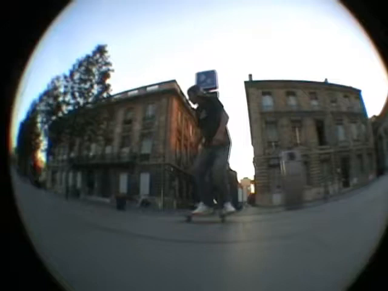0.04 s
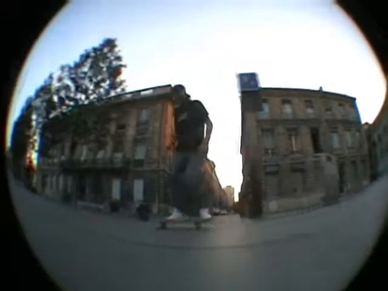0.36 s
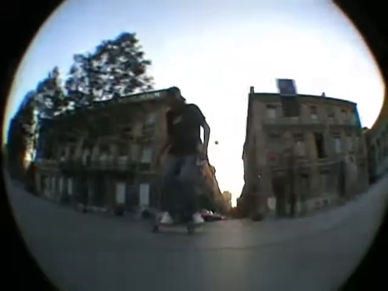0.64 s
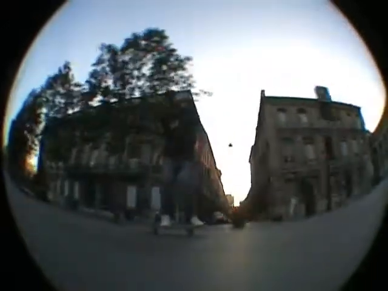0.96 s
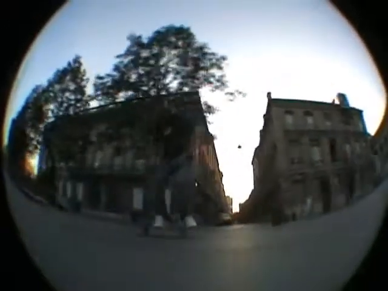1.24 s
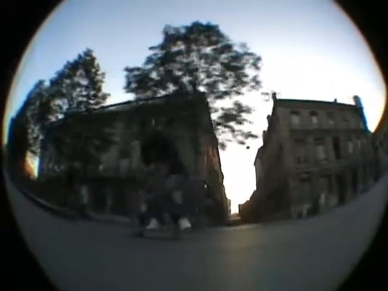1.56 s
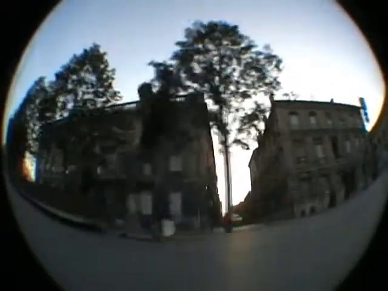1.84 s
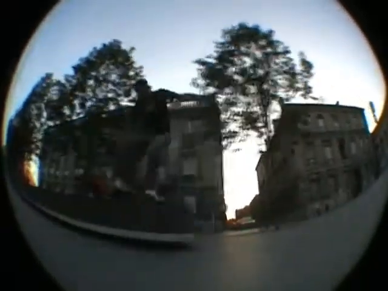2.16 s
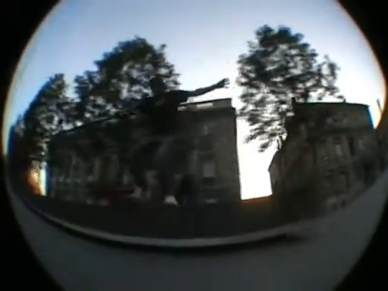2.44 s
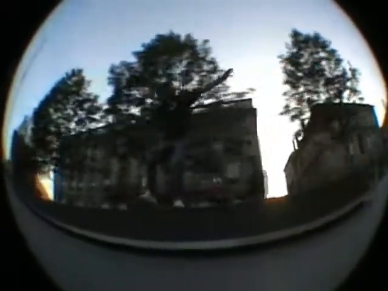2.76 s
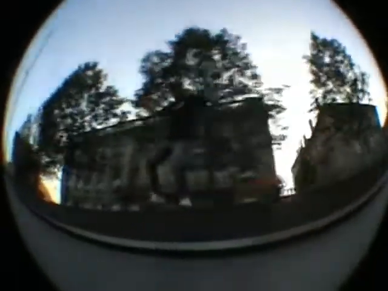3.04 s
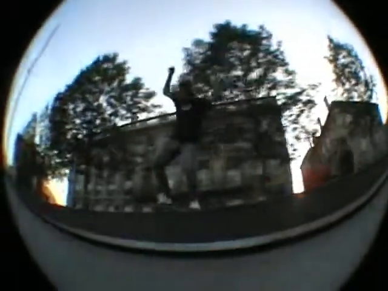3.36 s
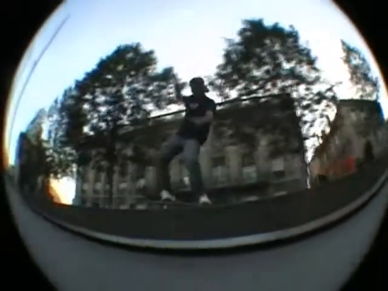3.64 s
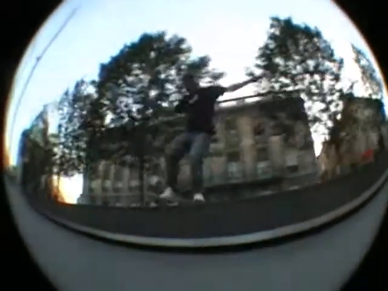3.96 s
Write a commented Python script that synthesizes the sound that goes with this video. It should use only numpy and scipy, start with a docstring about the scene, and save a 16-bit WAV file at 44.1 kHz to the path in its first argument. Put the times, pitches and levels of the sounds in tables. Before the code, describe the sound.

A skateboard cuts in at about 0.2 seconds, rolling close by over paving with a hollow, gritty rumble and clacking over joints several times a second. Low wind buffets the microphone, stronger from about 1.4 seconds. Near 2 seconds the tail cracks on the stone for a jump and the rolling briefly dips. From 2.5 seconds the wheels ring louder, with faint metal chinks, clacking on until 4 seconds.

```python
"""A skateboard rolls over the paving slabs of an open square, heard by a camera just above the ground.
The sound cuts in mid-ride: grit under the wheels keeps the deck booming and hissing, each axle clacks
over the joints between slabs, and air buffets the microphone. Soon loose steel chinks for the first time.
Halfway through, the tail cracks on the stone for a jump; then the wheels ring louder, with more chinks.
All along, the camera's hum filter and limiter give everything a hollow, squeezed colour."""
import sys
import numpy as np
from scipy import signal
from scipy.fft import rfft, irfft
from scipy.io import wavfile
from scipy.ndimage import uniform_filter1d

SR = 44100
rng = np.random.default_rng(int(sys.argv[2]) if len(sys.argv) > 2 else 0)


def to_wav(sig):
    """Store sig (one row per channel, or 1-D mono) as 16-bit WAV at the path in sys.argv[1].

    Samples outside -1..1 are clipped; the rate is SR.
    """
    pcm = np.clip(np.atleast_2d(sig), -1, 1) * 32767
    pcm = np.round(pcm).astype(np.int16)
    wavfile.write(sys.argv[1], SR, pcm.T)  # frames by channels


N = 176400

# how hard the air hits the microphone: t/s, level/dB
GUSTS = [(.6, -26.5), (1.4, -19), (2.1, -20.5), (2.6, -17.5), (3.95, -25)]
# tone of that air at the two microphone openings: f/Hz, shared level/dB, opposed level/dB
WIND_TONE = [(20, -31, -26), (55.4, -8, 1), (103, -3.5, 8), (183, 1, 1), (274, -9.5, -6.5),
             (420, -24, -16.5), (2000, -70, -53)]
# hum and thin ringing of wheels and bearings: f/Hz, width/Hz, level/dB
WHEEL_TONES = [(176, 40, -26), (1817, 81, -29.5), (4616, 170, -34.5), (5640, 400, -41.5)]
# that ringing swells in the second half: t/s, level/dB
WHEEL_SWELL = [(2.25, -6.5), (2.55, -0.5)]
# loose steel chinks in a truck (the metal axle holder): t/s, level/dB
CHINKS = [(.769, -32), (2.495, -30), (3.52, -25), (3.896, -23)]
# hollow knock of the deck (the wooden plank): f/Hz, level/dB
DECK_TONES = [(525, -1.5), (690, -5.5)]
# ringing of the wood when its tail hits the stone: f/Hz, level/dB
TAIL_TONES = [(1440, -10.5), (2790, -4.5), (3240, -11), (5170, -13.5)]
# an axle crosses a joint or jolts on the stone: t/s, bass boom/dB, middle clack/dB, treble tick/dB
JOINTS = [(.245, -0.5, -10.5, -18.5), (0.348, -14, -15, -25), (0.362, -2.5, -7.5, -18),
          (.463, -17, -15, -24.5), (.562, -2, -10, -19), (.655, -32, -11.5, -19.5), (.680, -2, -6, -18.5),
          (0.77, -36, -14, -31), (.882, -2.5, -8, -19.5), (.972, -26, -15, -25), (.999, -2, -8, -19),
          (1.088, -17, -14.5, -31), (1.206, 1, -6.5, -18), (1.325, 1, -7.5, -17.5), (1.342, -14, -7, -14),
          (1.529, -2, -7, -14), (1.644, -14, -11, -24), (1.653, -1, -11.5, -18), (1.825, -10, -12, -18.5),
          (1.858, -3, -12, -20.5), (1.938, -25, -13, -17.5), (1.968, -26, -10, -16),
          (1.983, -16, -14.5, -23), (2.198, -5, -12.5, -22.5), (2.243, -7.5, -13.5, -15.5),
          (2.325, -5, -9.5, -21), (2.545, -3, -6, -18.5), (2.675, -2.5, -7.5, -15), (2.753, -19, -25, -24),
          (2.901, 1.5, -10, -20), (3.03, -2.5, -7.5, -20), (3.255, -4.5, -8, -17.5),
          (3.388, -11.5, -10, -18.5), (3.521, -15, -14.5, -22), (3.615, -7.5, -10.5, -18.5),
          (3.753, 0, -8.5, -15.5), (3.896, -26, -13, -23), (3.978, -13, -9, -19)]
# rolling between joints: t/s, level/dB, brightness/dB (added once to the middle, twice to the treble)
ROLLING = [(.18, 0.5, 0), (.3, -2.5, 0.4), (.48, 1, -1.5), (.72, -1.5, 1), (1.13, 0.5, -0.9),
           (1.72, 0.5, -0.56), (2.05, -3.5, 0), (2.17, 0, -1), (2.28, -6.5, 0), (2.39, -6.5, 0.2),
           (2.52, 0.5, 1), (2.6, -3.5, 1.5), (2.97, 0.3, 0), (3.55, -1, 0.9), (3.95, 0.5, 0.6)]
# how board and wheels ring: f/Hz, level/dB
BOARD_TONE = [(90, -18.5), (200, -18.5), (280, -9.5), (335, -1.5), (375, 0.5), (440, -2.5), (520, -2.5),
              (630, -5), (730, -4), (810, -11.5), (960, -16), (1250, -13), (1600, -14), (1880, -10.5),
              (2330, -12.5), (2600, -16), (4400, -24.5), (6500, -32), (9400, -35.5), (12000, -43),
              (15500, -65)]
# shaking of the board, a row each for bass, middle and treble (bands 0, 1, 2):
# rolling/dB, grit unevenness/dB, joint/dB, joint rise/s, joint decay/s, left-right difference/dB
BANDS = [(-13.5, 1.26, 0.84, 0.00082, 0.0055, -22.5), (-21, 1.7, -0.05, .0006, 0.01, -16.5),
         (-32, 3, -1.2, 0.00047, 0.0063, -5)]
# where the board sits between the ears: f/Hz, left minus right/dB
BALANCE = [(750, 1.86), (2200, .5), (4600, 1.7), (10500, -1.5)]

BAND_EDGES_HZ = (965, 3830)  # borders of bass, middle and treble
GRAINS_PER_S, FLUTTER_HZ, FLUTTER_DB = 12000, 34, 1.2
CHATTER_HZ, CHATTER_DB = 350, 2  # a loose truck breaks knocks and chinks into tiny impacts
SCUFF_S, SCUFF_DB, SNAP_DB = .0055, -10, -8.5
SECOND_WHEEL_S, SECOND_WHEEL_DB = .0055, -6
RATTLE_S, RATTLE_DB = .014, -9.5
DECK_T60_S, DECK_PITCH_SPREAD = .059, .044  # T60 is the time to fade by 60 dB
JUMP_S, TAIL_T60_S = 1.969, .032
CHINK_DECAY_S, CHINK_HZ, CHINK_WIDTH_HZ = .014, 9020, 770
WIND_LEAN_DB = 1.37  # left goes up by this much, right goes down
HUM_HZ, HUM_FEEDBACK, HUM_DEPTH, HUM_FADE_HZ = 150.25, .48, .92, 17300
LIMIT_DB, LIMIT_SLOPE, RECOVER_DB_PER_S = -7, .63, 59
START_S, CEILING, TOP_HZ = .165, 1.08, 15700


def amp(db):
    """Turns decibels into a number to multiply by."""
    return 10 ** (np.asarray(db) / 20)


def unit(x):
    """Scales a signal to an average strength (rms) of 1."""
    return x / np.sqrt(np.mean(x ** 2) + 1e-20)


def spectrum(points, hz):
    """Reads a table on a log-frequency axis."""
    f, value = np.transpose(points)
    return np.interp(np.log(hz + 1), np.log(f + 1), value)


def curve(rows, column=1):
    """Reads one column of a table over time."""
    rows = np.array(rows)
    return np.interp(np.arange(N) / SR, rows[:, 0], rows[:, column])


def add(mix, start_s, sound):
    """Mixes a sound in at a given time."""
    part = mix[:, round(start_s * SR):][:, :sound.shape[1]]
    part += sound[:, :part.shape[1]]


def wander(rate_hz):
    """A random drift of strength 1, with little movement faster than rate_hz."""
    hz = np.fft.rfftfreq(N, 1 / SR)
    return unit(irfft(rfft(rng.standard_normal(N)) / (1 + (hz / rate_hz) ** 4), N))


def hiss(centre_hz, width_hz):
    """Noise of strength 1, gathered around one pitch."""
    offset_hz = np.fft.rfftfreq(N, 1 / SR) - centre_hz
    return unit(irfft(rfft(rng.standard_normal(N)) / (1 + (offset_hz / width_hz) ** 2), N))


def struck(tones, t60_s, pitch=1, size=6000):
    """Tones that ring out after one blow."""
    t = np.arange(size) / SR
    return sum(amp(db - 60 * t / t60_s) * np.sin(2 * np.pi * hz * pitch * t) for hz, db in tones)


def wind():
    """Air buffets in low lumps, mostly pushing at one microphone opening as it pulls at the other."""
    hz, table = np.fft.rfftfreq(N, 1 / SR), np.array(WIND_TONE)
    shape = amp([spectrum(table[:, [0, k]], hz) for k in (1, 2)])
    shared, opposed = unit(irfft(rfft(rng.standard_normal((2, N))) * shape, N))
    left = (shared + opposed) * amp(WIND_LEAN_DB)
    right = (shared - opposed) / amp(WIND_LEAN_DB)
    return np.array([left, right]) * amp(curve(GUSTS) + wander(rate_hz=4.8))


def wheels():
    """Wheels and bearings hum and ring thinly as they roll."""
    ringing = sum(amp(db) * hiss(hz, width_hz) for hz, width_hz, db in WHEEL_TONES)
    return ringing * amp(curve(ROLLING) + curve(WHEEL_SWELL))


def chinks():
    """Sudden, quickly dying flurries of tiny impacts ring a small piece of steel."""
    t = np.arange(N) / SR
    flurries = sum(amp(db) * (t >= s) * np.exp(-abs(t - s) / CHINK_DECAY_S) for s, db in CHINKS)
    return flurries * hiss(CHINK_HZ, CHINK_WIDTH_HZ) * amp(CHATTER_DB * wander(CHATTER_HZ))


def deck():
    """The wood knocks hollowly at each joint, and cracks once as the tail is snapped down."""
    out = np.zeros((2, N))
    for s, boom_db, *_ in JOINTS:
        pitch = 1 + DECK_PITCH_SPREAD * rng.standard_normal()
        add(out, s, amp(boom_db) * struck(DECK_TONES, DECK_T60_S, pitch)[None])
    add(out, JUMP_S, struck(TAIL_TONES, TAIL_T60_S)[None])
    return out


def board_ring(band, size=4096):
    """How the board rings after one tap, in its bass, middle or treble."""
    hz = abs(np.fft.fftfreq(size, 1 / SR))
    below_middle, below_treble = (1 / (1 + (hz / edge) ** 10) for edge in BAND_EDGES_HZ)
    share = [below_middle, (1 - below_middle) * below_treble, 1 - below_treble][band]
    gain = amp(spectrum(BOARD_TONE, hz)) * np.sqrt(share)
    # minimum phase: the ring starts at the tap and then dies away
    response = np.exp(np.conj(signal.hilbert(np.log(gain + 1e-5))))
    ring = np.fft.ifft(response).real[:size // 2]
    return ring / np.linalg.norm(ring)


def grit(uneven_db):
    """Dense tiny knocks of the wheels on rough stone: a shared row and a left-right difference row."""
    hits = rng.random(N) < GRAINS_PER_S / SR
    strength = amp(uneven_db * np.minimum(rng.exponential(1, N), 4))
    return unit(hits * strength * rng.standard_normal((2, N)))


def joint(rise_s, decay_s, rattle_gain, size=4000):
    """Two wheels scuff into the gap and hit its edge in turn with a snap; the truck rattles on."""
    t = np.arange(size) / SR
    blow = (1 - np.exp(-t / rise_s)) * np.exp(-(t / decay_s) ** 2)
    scuff = amp(SCUFF_DB) * t / SCUFF_S * (t < SCUFF_S)
    out = scuff * rng.standard_normal((2, size))
    for delay_s, db in [(0, 0), (SECOND_WHEEL_S * (.5 + rng.random()), SECOND_WHEEL_DB)]:
        force = blow * rng.choice([-1., 1.], (2, size))
        force[0, round(rise_s * SR)] += amp(SNAP_DB) * np.linalg.norm(blow)
        add(out, SCUFF_S + delay_s, amp(db) * force)
    add(out, SCUFF_S, rattle_gain * np.exp(-t / RATTLE_S) * rng.standard_normal((2, size)))
    return out


def skateboard():
    """Grit and joints shake the board, while the load on the wheels flutters."""
    out = np.zeros((2, N))
    bright_db = curve(ROLLING, column=2)
    load_db = curve(ROLLING) + FLUTTER_DB * wander(FLUTTER_HZ)
    chatter_db = CHATTER_DB * wander(CHATTER_HZ)
    for band, (roll_db, uneven_db, joint_db, rise_s, decay_s, side_db) in enumerate(BANDS):
        # multiplying by band keeps rattle and chatter out of the bass and strongest in the treble
        knocks = np.zeros((2, N))
        for s, *level_db in JOINTS:
            knock = joint(rise_s, decay_s, band * amp(RATTLE_DB))
            add(knocks, s - SCUFF_S, amp(level_db[band] + joint_db) * knock)
        rolling = grit(uneven_db) * amp(load_db + band * bright_db + roll_db)
        force = rolling + knocks * amp(band * chatter_db)
        shared, side = signal.oaconvolve(force, board_ring(band)[None], axes=1)[:, :N]
        out += [shared + amp(side_db) * side, shared - amp(side_db) * side]
    return out


def scene():
    """The board, close and a little to the left, with the wind."""
    board = skateboard() + deck() + wheels() + chinks()
    lean_db = spectrum(BALANCE, np.fft.rfftfreq(N, 1 / SR)) / 2
    return irfft(rfft(board) * amp([lean_db, -lean_db]), N) + wind()


def hum_filter(x):
    """Subtracting a short echo cuts every multiple of the camera motor's hum, less so in the treble."""
    hz = np.fft.rfftfreq(2 * N, 1 / SR)
    echo = HUM_DEPTH * np.exp(-(hz / HUM_FADE_HZ) ** 2 - 2j * np.pi * hz / HUM_HZ)
    comb = (1 + HUM_FEEDBACK) / 2 * (1 - echo) / (1 - HUM_FEEDBACK * echo)
    return irfft(rfft(x, 2 * N) * comb)[:, :N]


def limiter(x):
    """Turns loud moments down at once, then lets the level creep back."""
    power = uniform_filter1d((x ** 2).mean(0), size=200)
    power_db = 10 * np.log10(abs(power) + 1e-12)
    recovery_db = np.arange(N) * RECOVER_DB_PER_S / SR
    held_db = np.maximum.accumulate(power_db + recovery_db) - recovery_db
    over_db = np.maximum(held_db - LIMIT_DB, 0)
    return x / amp(LIMIT_SLOPE * uniform_filter1d(over_db, size=100))


def record(dry):
    """The sound cuts in; the camera hollows it, squeezes it and trims the highest treble."""
    switched_on = np.arange(N) > START_S * SR
    x = limiter(hum_filter(dry * switched_on))
    x = x / (1 + (x / CEILING) ** 6) ** (1 / 6)  # soft overload rounds off the peaks
    treble_cut = signal.firwin(511, TOP_HZ, window=("kaiser", 9), fs=SR)
    return signal.oaconvolve(x, treble_cut[None], "same")


dry = scene()
out = record(dry)
to_wav(out)
```